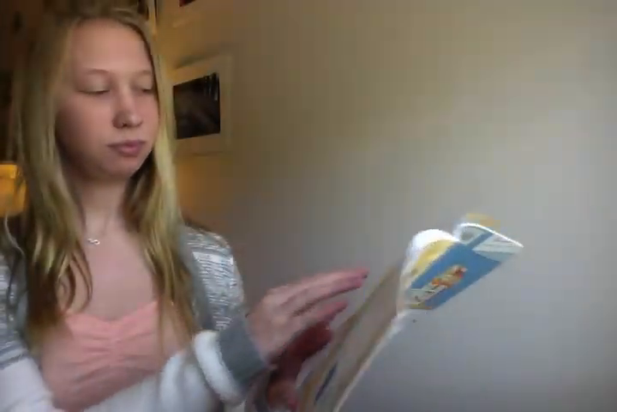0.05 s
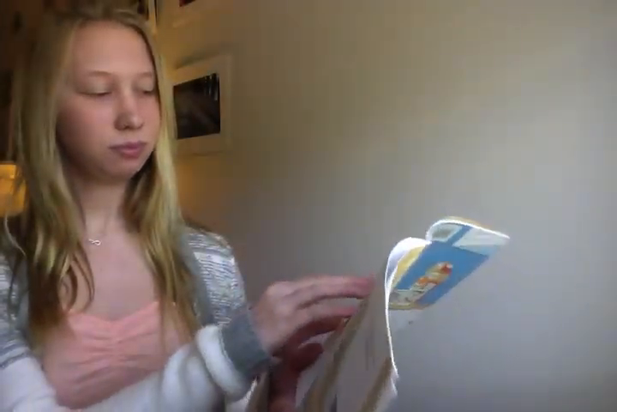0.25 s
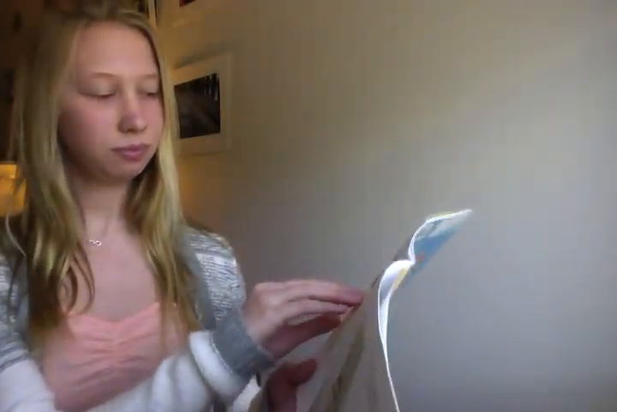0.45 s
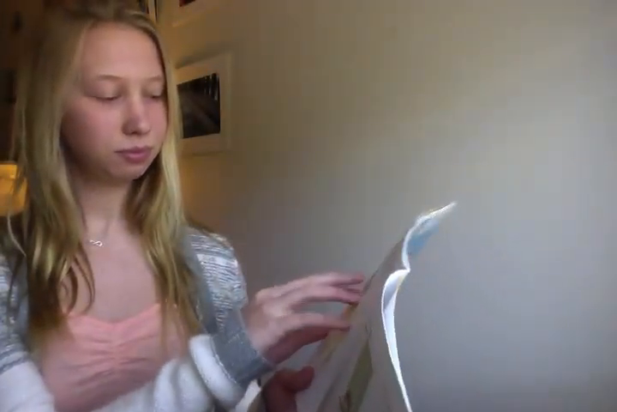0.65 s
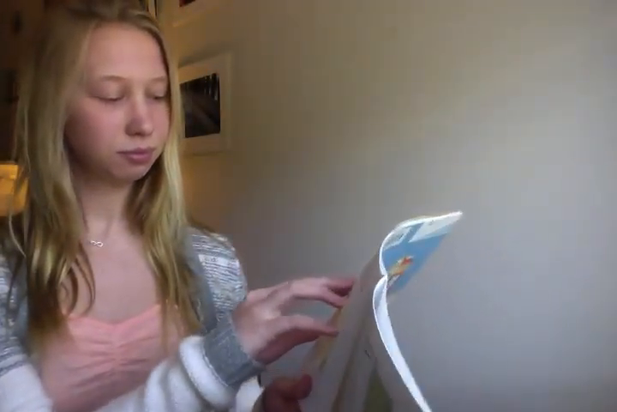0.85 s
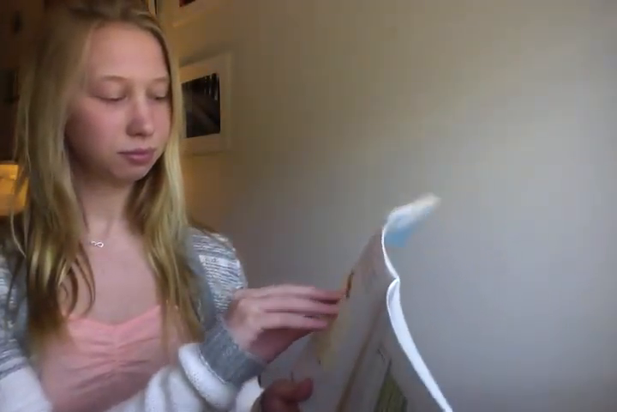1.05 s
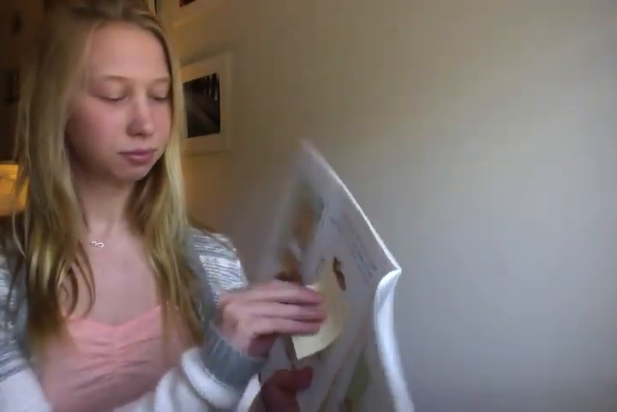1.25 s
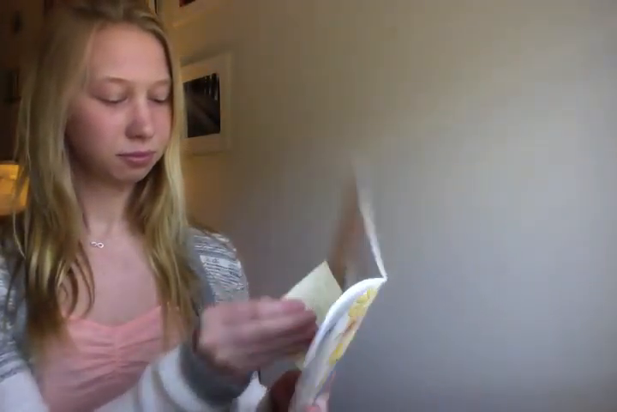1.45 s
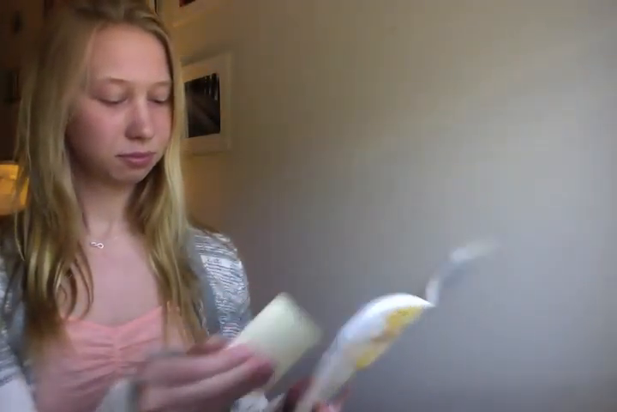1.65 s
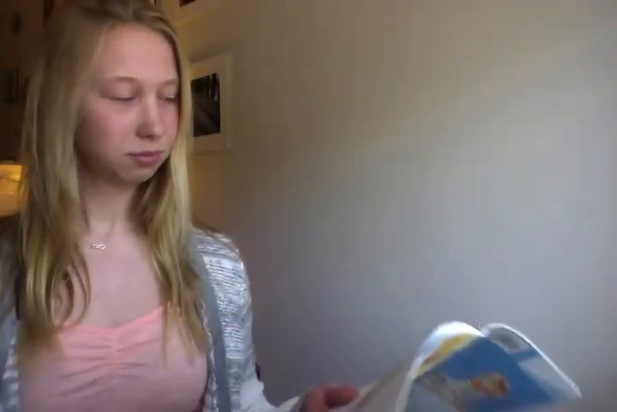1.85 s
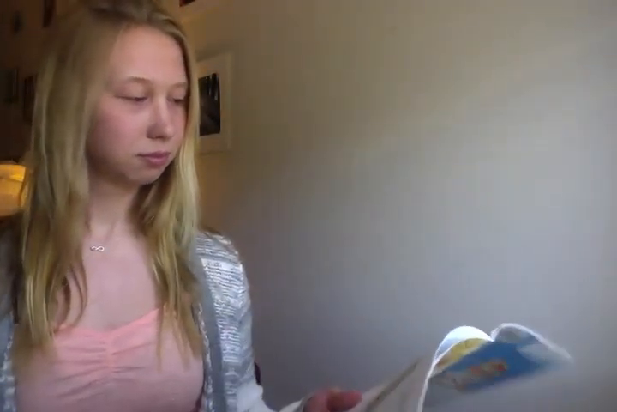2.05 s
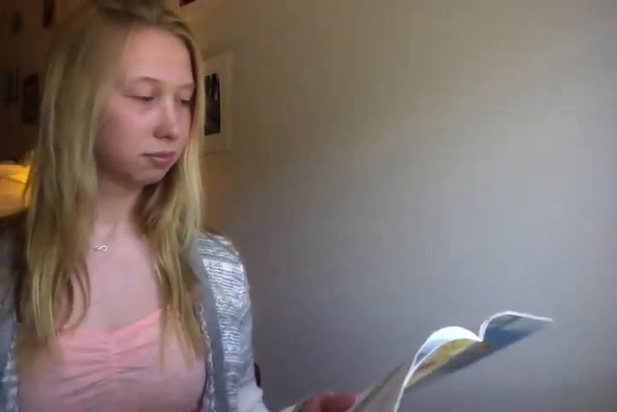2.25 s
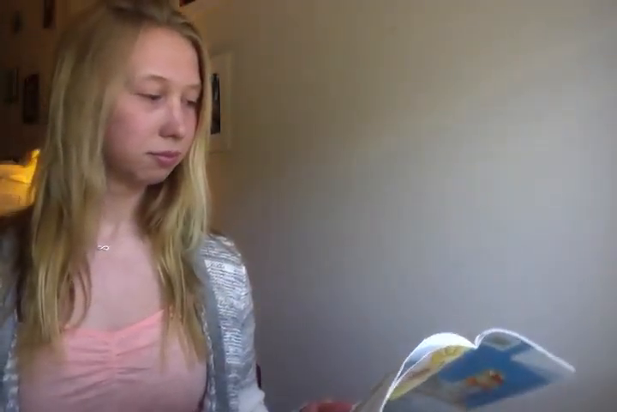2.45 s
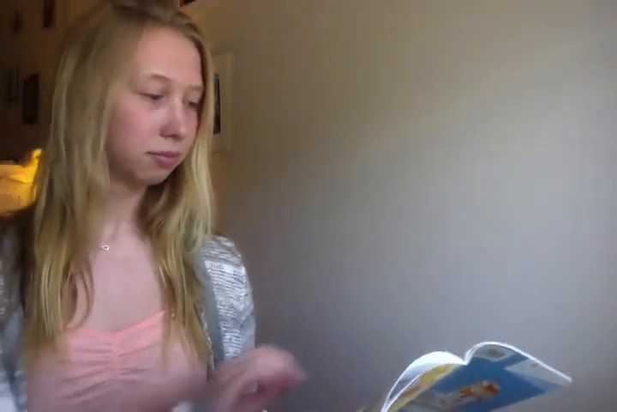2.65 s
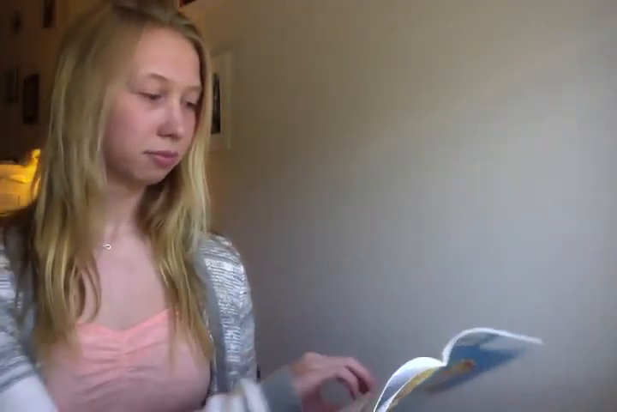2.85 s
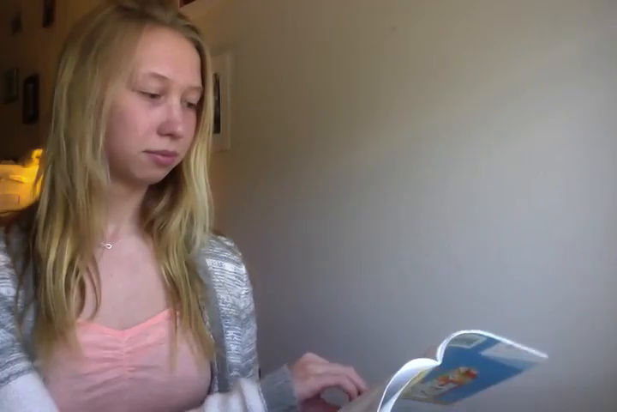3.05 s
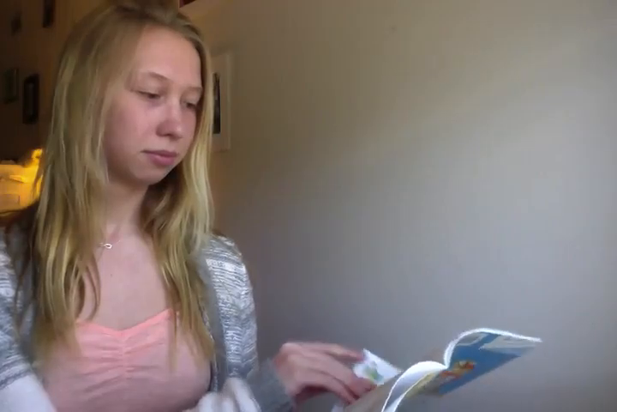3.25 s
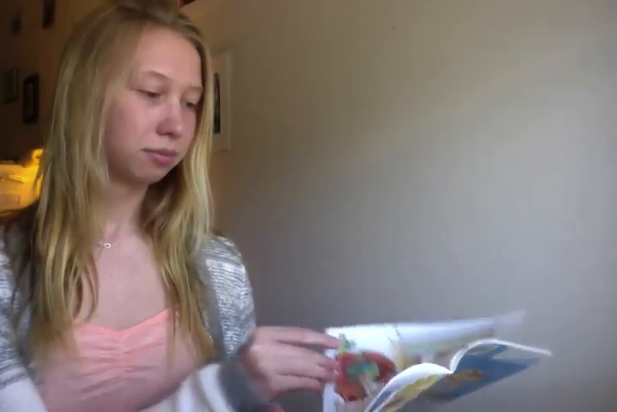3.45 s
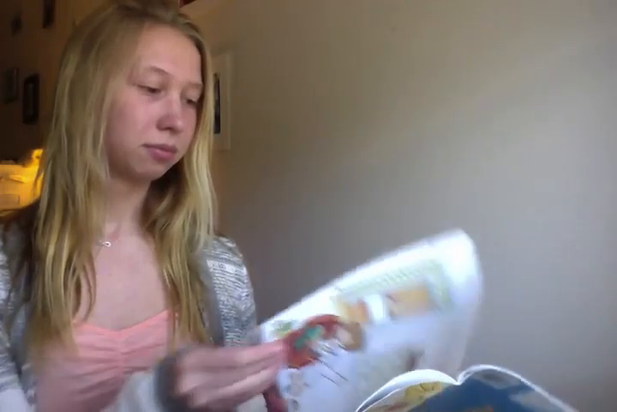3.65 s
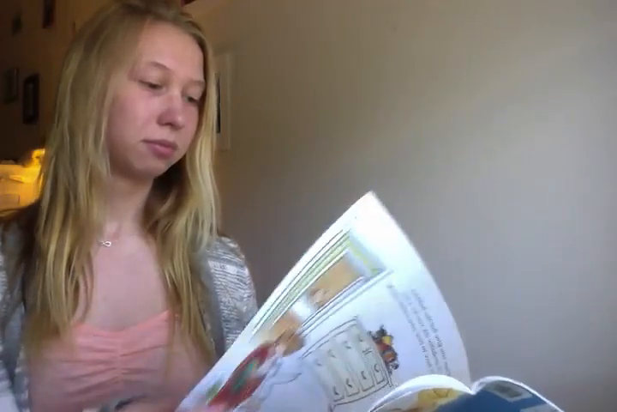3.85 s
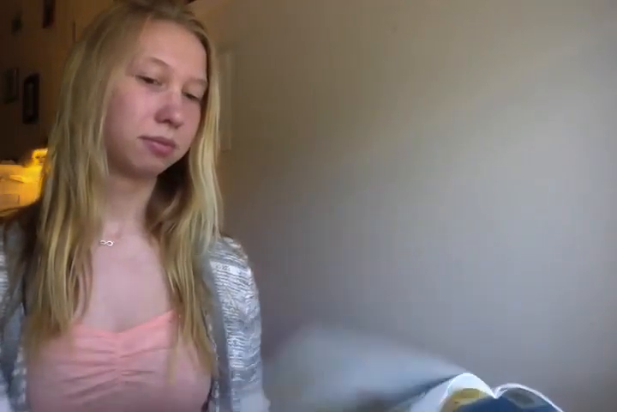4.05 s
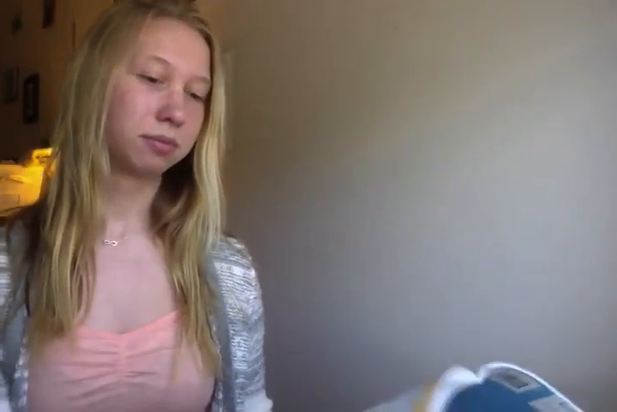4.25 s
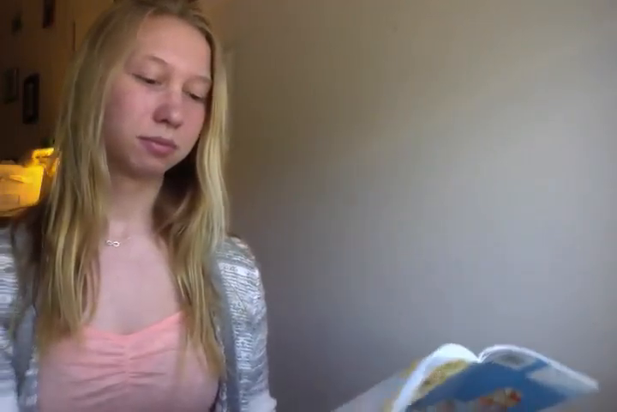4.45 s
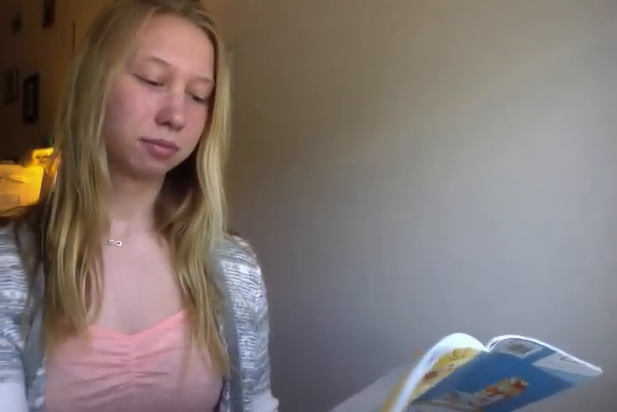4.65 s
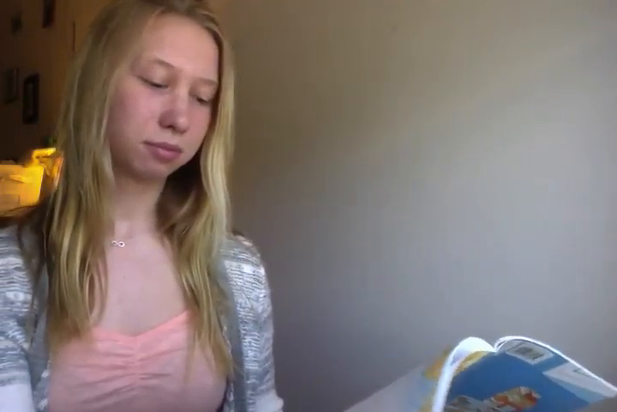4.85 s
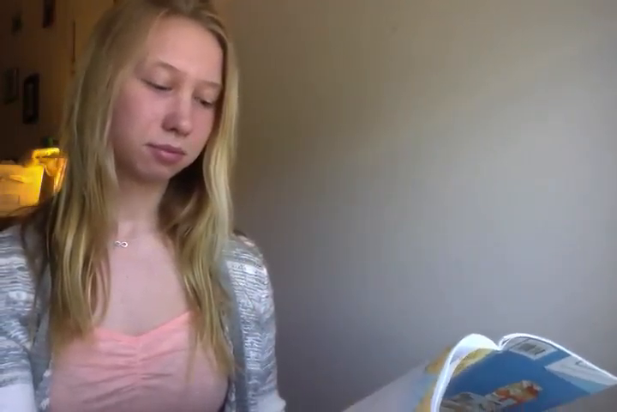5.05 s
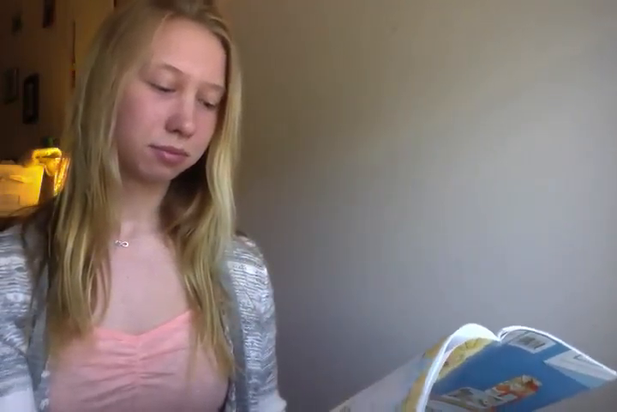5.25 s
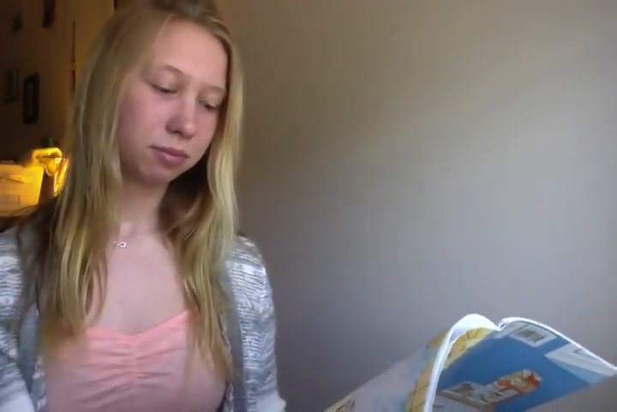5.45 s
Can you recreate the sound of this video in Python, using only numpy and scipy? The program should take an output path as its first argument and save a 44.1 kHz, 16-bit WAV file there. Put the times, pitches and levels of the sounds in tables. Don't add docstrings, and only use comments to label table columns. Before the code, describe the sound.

Paper handling in a small, softly furnished-sounding room: faint rustle, a dull knock, then a loud crisp crack and bright rasping sheets. After a pause come lighter crackles, and later a page turn with hollow buckling pops, flaps and a final rub. A thin boxy close microphone also catches low fan drone, slight whine and hiss, left alone at the end.

```python
import sys
import numpy as np
from scipy import signal
from scipy.io import wavfile
from scipy.ndimage import uniform_filter1d

SR = 44100
rng = np.random.default_rng(int(sys.argv[2]) if len(sys.argv) > 2 else 0)


def dump_mix(stems):
    frames = np.atleast_2d(stems).T
    limited = np.clip(frames, -1, 1)
    pcm = np.round(limited * 32767).astype(np.int16)
    wavfile.write(sys.argv[1], SR, pcm)


def magnitude_from_level(level_db):
    exponent = np.asarray(level_db, float) / 20
    return 10 ** exponent


N = 243146
AWAY_S = (3.05, 3.9)


def evened(x):
    return x / np.sqrt(np.mean(x ** 2) + 1e-20)


def peaked(x, db):
    return magnitude_from_level(db) * x / abs(x).max()


def smoothed(x, size, axis=-1):
    return uniform_filter1d(uniform_filter1d(x, size, axis), size, axis)


def read(points, hz):
    f, value = np.transpose(points)
    return np.interp(np.log(hz + 1), np.log(f + 1), value)


def add(mix, s, sound):
    part = mix[round(s * SR):][:len(sound)]
    part += sound[:len(part)]


def dull(x, hz):
    return signal.sosfilt(signal.butter(2, hz, fs=SR, output="sos"), x)


def thinned(x, hz):
    return signal.sosfilt(signal.butter(2, hz, "highpass", fs=SR, output="sos"), x)


def band(x, lo_hz, hi_hz):
    sos = signal.butter(4, [lo_hz, hi_hz], "bandpass", fs=SR, output="sos")
    return signal.sosfilt(sos, x) * np.sqrt(SR / 2 / (hi_hz - lo_hz))


def resonate(x, hz, width):
    turn = np.exp(2j * np.pi * hz * np.arange(len(x)) / SR)
    r = np.exp(-np.pi * width / SR)
    return 2 * (turn * signal.lfilter([1 - r], [1, -r], x / turn)).real


# (frequency [Hz], level [dB per Hz])
AIR_SPECTRUM = [(15, -79.5), (25, -43), (85, -15.5), (103, -8.5), (124, -7.5), (141, -11), (179, -4.5),
                (322, -19.5), (1010, -19), (1100, -16), (1290, -26), (1820, -20.5), (2250, -30),
                (3540, -31.5), (14300, -45.5), (15200, -64)]


def hiss(patchy_db=-0.95):
    frames, hz = N // 512 + 5, np.fft.rfftfreq(2048, 1 / SR)
    a, b, patches = rng.standard_normal((frames, 1025, 3)).T
    patches = uniform_filter1d(uniform_filter1d(patches, 20, 0), 8, 1)
    level_db = read(AIR_SPECTRUM, hz)[:, None] + patchy_db * evened(patches)
    noise = signal.istft((a + 1j * b) * magnitude_from_level(level_db), nperseg=2048, noverlap=1536)[1][:N]
    return magnitude_from_level(-70.5) * evened(noise)


# (frequency [Hz], width [Hz], level [dB])
FAN_TONES = [
    (116.6, 11, -78),
    (1060, 8.4, -84),
    (918, 60, -88.5),
]


def fan_tones(shake):
    return sum(magnitude_from_level(db) * evened(resonate(resonate(shake, hz, width), hz, width))
               for hz, width, db in FAN_TONES)


def fan_drone(shake):
    t, drone_hz = np.arange(N) / SR, 169.4
    wander_hz = 1.5 * evened(smoothed(shake, 4000))
    steady = np.sqrt(2) * np.sin(2 * np.pi * np.cumsum(drone_hz + wander_hz) / SR)
    rough = evened(resonate(resonate(shake, drone_hz, 23), drone_hz, 12))
    beat_db = 6.6 * np.cos(2 * np.pi * 1.02 * t - 4.0) + 2.5 * np.cos(2 * np.pi * .47 * t - 1.6)
    return (0.9 * steady + 0.35 * rough) * magnitude_from_level(-73.5 + beat_db)


# (time [s], level [dB])
AIR_SWELL = [
    (0, 4),
    (.5, 2),
    (1.3, 8),
    (2, 4.5),
    (2.5, 7),
    (3, 4),
    (3.5, 7),
    (4.8, 3),
    (5.52, -3.5),
]


def air():
    noise = hiss()
    shake = rng.standard_normal(N)
    swell = magnitude_from_level(np.interp(np.arange(N) / SR, *np.transpose(AIR_SWELL)))
    return swell * (noise + fan_tones(shake) + fan_drone(shake))


def burst(shudder, t60, tick):
    t = np.arange(len(shudder)) / SR
    dying = shudder * magnitude_from_level(-60 * t / max(t60, .003)) * np.minimum(t / 0.00064, 1)
    return dying + tick * (np.arange(len(t)) == 8)


def ring(x, hz, sharp):
    for _ in range(3):
        x = resonate(x, hz, hz / sharp)
    return x


def low_note(db, hz, t60):
    return peaked(ring(burst(rng.standard_normal(3500), t60, tick=7.7), hz, sharp=1.25), db)


# (time [s], peak level [dB], pitch [Hz])
THUMPS = [(.251, -57, 348), (0.992, -45, 103), (0.989, -31, 285), (.9951, -34.5, 318), (1.004, -44.5, 210),
          (1.0245, -45, 425), (1.04, -42, 362), (1.294, -37.5, 226), (1.344, -42, 375), (1.382, -44.5, 200),
          (2.063, -49, 315), (2.242, -42, 149), (2.243, -38, 288), (2.2537, -39, 340), (2.256, -36, 250),
          (2.2988, -46.5, 373), (2.326, -46.5, 327), (2.33, -45.5, 223), (2.3542, -46.5, 380),
          (2.428, -50.5, 333), (2.555, -40.5, 280), (3.598, -51.5, 227), (3.779, -40, 348)]


def thumps():
    out = np.zeros(N)
    for s, db, hz in THUMPS:
        add(out, s, low_note(db, hz, .008 + 4.5 / hz))
    return thinned(out, 60)


# (time [s], peak level [dB], pitch [Hz])
KNOCKS = [(.036, -51.5, 910), (.87, -52.5, 766), (0.9883, -28, 528), (1.135, -44.5, 576), (1.214, -29, 945),
          (1.222, -37, 1050), (1.343, -26.5, 954), (1.3965, -33.5, 726), (1.476, -36.5, 580),
          (2.195, -50.5, 563), (2.552, -39.5, 430), (2.5613, -39, 452), (3.338, -37, 670),
          (3.374, -42.5, 740), (3.41, -47.5, 636), (3.434, -48, 643), (3.599, -26.5, 638),
          (3.6081, -42.5, 500), (3.714, -45.5, 729), (3.7575, -34, 804), (3.77, -27, 702),
          (3.7811, -25.5, 820), (3.8061, -29, 783), (3.8241, -41, 743), (3.8513, -43.5, 731),
          (3.909, -36.5, 623), (3.94, -45, 613), (4.096, -39, 774), (4.185, -45, 410), (4.261, -43, 743)]


def knocks():
    out = np.zeros(N)
    for s, db, hz in KNOCKS:
        add(out, s, low_note(db, hz, .016))
    return thinned(out, 60)


def upper_levels(crackle_db, fizz_db, top_db):
    bright = np.minimum(fizz_db - crackle_db, 3)
    return [crackle_db - 4.0, crackle_db - 3.0 + 0.28 * bright, fizz_db, fizz_db + top_db + .4 * bright]


def rubbing(peak_db, shape_db, fizz_db, weight_db):
    crackle_db = peak_db + shape_db
    thud_db = peak_db + 0.8 * shape_db + weight_db - 7
    body_db = crackle_db + weight_db
    uppers = upper_levels(crackle_db, crackle_db + fizz_db, top_db=-10.5)
    return magnitude_from_level(2 * np.array([thud_db, body_db] + uppers))


def stroke_shape(coarse, s, rise, fall, curl):
    distance = np.maximum((s - coarse) / max(rise, 1e-3), (coarse - s) / max(fall, 1e-3))
    return np.maximum(-21 * distance ** curl, -200)


# (time [s], crackle level [dB])
GRIP = [
    (0, -90),
    (.7, -76.5),
    (1.0, -81.5),
    (2.1, -89.5),
    (2.7, -74),
    (3.2, -81.5),
    (3.7, -82.5),
    (4.25, -68.5),
    (4.72, -82),
    (4.8, -110),
]


def grip(coarse):
    return rubbing(np.interp(coarse, *np.transpose(GRIP)), 0 * coarse, fizz_db=-9.5, weight_db=4.5)


# (fastest time [s], rise [s], fall [s], crackle level [dB], fizz against it [dB])
SWISHES = [(.38, 0.088, 0.068, -67.5, -6), (.466, 0.014, 0.077, -61.5, -13), (0.553, 0.042, 0.069, -55, 0),
           (1.144, 0.071, 0.064, -59, 4.2), (1.466, 0.07, 0.096, -39.5, 5.5), (1.54, 0.14, 0.057, -43, 6),
           (1.614, 0.087, 0.056, -34.5, -4), (2.07, .04, 0.039, -75.5, -8.5),
           (2.251, 0.037, 0.051, -46.5, 2.7), (2.401, 0.051, 0.042, -61, 4), (2.934, .015, 0.044, -67, -4),
           (3.29, .04, 0.084, -69, 0.5), (3.414, 0.15, 0.04, -49.5, -4.5), (3.55, 0.072, 0.038, -67.5, -17),
           (4.01, 0.044, 0.14, -61, -0.5), (4.071, 0.043, 0.063, -47, -11.5),
           (4.16, .06, 0.053, -54, -10.5), (4.3, 0.054, 0.074, -51.5, -10), (4.375, 0.022, 0.023, -57, -38),
           (4.45, 0.093, 0.37, -70, -10)]


def swishes(coarse):
    return sum(rubbing(db, stroke_shape(coarse, s, rise, fall, curl=1.7), fizz_db, 0)
               for s, rise, fall, db, fizz_db in SWISHES)


# (time [s], fall [s], crackle level [dB], fizz against it [dB], weight against it [dB])
SHUDDERS = [(0.001, .09, -80, -9, 6), (1.224, 0.084, -35, -5, -17), (1.402, 0.12, -43.5, -5, 5),
            (1.74, 0.037, -67, -10.5, 5), (2.195, 0.12, -45, -18, -5.5), (2.222, 0.049, -42, -17, -3),
            (2.317, 0.048, -46, 1.5, -8), (2.323, 0.064, -43.5, -2, -13), (2.568, 0.041, -54, -2.5, 7),
            (3.18, .07, -72, -10, 0.5), (3.256, .05, -55.5, -5.5, -5), (3.609, 0.028, -49, -11, 10.5),
            (3.782, 0.053, -53, -41, 14.5), (4.108, 0.038, -50.5, -1, 4.5), (4.274, 0.048, -40, -14, -5.5),
            (4.287, 0.04, -38, -14.5, -22), (4.303, 0.027, -37, -13, -14.5), (1.408, .05, -52, 9.5, -6.5),
            (4.382, 0.054, -72.5, -24.5, 17)]


def shudders(coarse):
    return sum(rubbing(db, stroke_shape(coarse, s, .006, fall, curl=1), fizz_db, weight_db)
               for s, fall, db, fizz_db, weight_db in SHUDDERS)


def streaked(x, streak_db):
    z = signal.stft(x, nperseg=256)[2]
    streaks = uniform_filter1d(uniform_filter1d(rng.standard_normal(z.T.shape), 24, 0), 2, 1).T
    return evened(signal.istft(z * magnitude_from_level(streak_db * evened(streaks)), nperseg=256)[1][:N])


def fibres():
    t, grains_per_s = np.arange(N) / SR, 1300
    heights = magnitude_from_level(3.9 * np.minimum(rng.exponential(1, N), 5))
    ticks = heights * (rng.random(N) < grains_per_s / SR) * rng.choice([-1., 1.], N)
    smooth = np.where((t > 1.38) & (t < 1.68), 1.0, 2.2)
    rub = streaked(evened(ticks) + smooth * rng.standard_normal(N), streak_db=3.2)
    return rub * magnitude_from_level(2.0 * evened(smoothed(rng.standard_normal(N), 200)))


# (low edge [Hz], high edge [Hz])
PAPER_BANDS = [
    (280, 1013),
    (1100, 2690),
    (3000, 4600),
    (4600, 7000),
    (7000, 12500),
    (12500, 15700),
]


def slides():
    t, coarse = np.arange(N) / SR, np.arange(0, N / SR, 1 / 1000)
    power = grip(coarse) + swishes(coarse) + shudders(coarse)
    power[-1, (coarse > AWAY_S[0]) & (coarse < AWAY_S[1])] *= magnitude_from_level(-20)
    rub = fibres()
    return sum(band(rub * np.interp(t, coarse, np.sqrt(p)), *edges)
               for p, edges in zip(power, PAPER_BANDS))


def crease_body(shudder, db, hz, t60):
    return peaked(ring(burst(shudder, t60, tick=3.6), hz, sharp=1.23), db)


def crease_crackle(shudder, levels_db, t60):
    shorts = [1, 1, 0.6, 0.6]
    return sum(peaked(band(burst(shudder, t60 * short, tick=1.8), *edges), db)
               for short, edges, db in zip(shorts, PAPER_BANDS[2:], levels_db))


def snaps(rows, pitches_hz, top_db, t60):
    body, upper = np.zeros(N), np.zeros(N)
    for (s, body_db, crackle_db, fizz_db), hz in zip(rows, pitches_hz):
        shudder = rng.standard_normal(2500)
        add(body, s, crease_body(shudder, body_db, hz, t60))
        crackle = crease_crackle(shudder, upper_levels(crackle_db, fizz_db, top_db), t60)
        add(upper, s, dull(crackle, 11000) if AWAY_S[0] < s < AWAY_S[1] else crackle)
    return upper + dull(body, 4500)


# (time [s], body level [dB], crackle level [dB], fizz level [dB], body pitch [Hz])
TURN_SNAPS = [(2.9359, -56, -53.5, -42, 1835), (3.168, -40.5, -47.5, -52, 2190),
              (3.1758, -32, -37, -40, 2070), (3.2584, -56, -56, -51, 2240), (3.3386, -34, -42, -42, 1610),
              (3.3502, -35.5, -41, -39, 1810), (3.3735, -32, -56, -53, 1840), (3.3814, -46, -42, -40, 2158),
              (3.4105, -38, -59, -49, 1772), (3.4363, -35, -46, -46.5, 1500),
              (3.5992, -25.5, -55, -41.5, 1580), (3.6038, -30, -34.5, -44, 1269),
              (3.7156, -49, -69, -67, 1357), (3.7407, -40.5, -60, -74.5, 1593),
              (3.7568, -35, -66, -65, 1740), (3.771, -19.5, -42.5, -77, 2005),
              (3.776, -24.5, -36.5, -76, 1455), (3.8009, -37.5, -53, -70, 1440),
              (3.91, -44.5, -78.5, -75, 1140), (4.045, -38, -45, -47, 2238),
              (4.0955, -22.5, -30.5, -42, 2080), (4.106, -42, -34, -41.5, 1780),
              (4.26, -40, -70, -70, 1390), (4.3735, -38, -64, -80, 2348)]


def turn_snaps():
    rows = [row[:4] for row in TURN_SNAPS]
    return snaps(rows, [row[4] for row in TURN_SNAPS], top_db=-43, t60=.026)


# (time [s], body level [dB], crackle level [dB], fizz level [dB])
PEEL_SNAPS = [(0.039, -57, -78, -78), (.5396, -37.5, -44, -50), (0.872, -55, -77, -61),
              (0.9858, -40.5, -67, -57), (0.9907, -33.5, -43, -76), (1.1349, -43.5, -40, -46),
              (1.1452, -54, -41, -50), (1.2047, -43, -31.5, -40), (1.2133, -15.5, -12.5, -4),
              (1.2188, -20.5, -37, -11.5), (1.3435, -22, -20, -22.5), (1.3491, -26.5, -17.5, -32),
              (1.3974, -24.5, -46, -53.5), (1.4487, -32, -43, -28), (1.4832, -22, -26, -18.5),
              (1.5188, -28.5, -60, -24), (1.539, -28, -53, -27), (1.5703, -34, -56, -40),
              (1.6061, -25, -34, -23), (1.6142, -30, -24, -17.5), (1.6338, -24, -47, -54),
              (1.7131, -33, -56.5, -64), (2.191, -33, -49.5, -59), (2.1999, -34.5, -29.5, -49),
              (2.2208, -35, -46, -58), (2.245, -40, -29.5, -38), (2.2531, -57, -32.5, -31),
              (2.3271, -46, -30.5, -30), (2.5529, -37, -47, -41), (2.562, -36, -28.5, -37)]


def peel_snaps():
    crisp_db, soft_db = -47, -69
    crackle_db = np.transpose(PEEL_SNAPS)[2]
    soft = np.clip((crisp_db - crackle_db) / (crisp_db - soft_db), 0, 1)
    pitches_hz = 1962 * (1 - 0.43 * soft) * (1 + 0.017 * rng.standard_normal(len(soft)))
    return snaps(PEEL_SNAPS, pitches_hz, top_db=-15, t60=.019)


# (frequency [Hz], t60 [s])
ROOM_DECAY = [
    (250, 0.16),
    (660, .2),
    (1740, 0.19),
    (4590, 0.15),
    (12100, 0.05),
]
# (time [s], level [dB])
ECHOES = [
    (.0016, -25.5),
    (.0033, -17.5),
    (.0056, -17.5),
    (.0105, -15.5),
    (.016, -17.5),
]


def room(x):
    taps, near = np.zeros(SR // 2), np.zeros(SR // 2)
    at = np.arange(150, SR // 2 - 20, 12)
    taps[at + rng.integers(0, 12, len(at))] = rng.choice([-1., 1.], len(at))
    hz, t, z = signal.stft(taps, SR, nperseg=256)
    decay = magnitude_from_level(-60 * t / read(ROOM_DECAY, hz)[:, None])
    tail = signal.istft(z * decay, SR, nperseg=256)[1][:len(near)]
    for k, (s, db) in enumerate(ECHOES):
        near[round(s * SR)] = (-1) ** k * magnitude_from_level(db)
    return signal.fftconvolve(x, near + magnitude_from_level(-10) * tail / np.linalg.norm(tail))[:N]


# (frequency [Hz], width [Hz], lift [dB])
HOUSING = [
    (880, 810, 4),
    (2137, 390, 2.5),
    (3670, 2050, 6.5),
    (5278, 390, 7.5),
    (9700, 1610, 8.5),
]


def housing(x):
    return x + sum((magnitude_from_level(db) - 1) * resonate(x, hz, width) for hz, width, db in HOUSING)


def scene():
    creases = peel_snaps() + turn_snaps()
    book = dull(knocks() + thumps(), 2500)
    paper = magnitude_from_level(-2.5) * creases + book + magnitude_from_level(-4.5) * slides()
    paper = paper + room(paper)
    return (magnitude_from_level(-5) * housing(paper) + air())[None]


def band_limit(x):
    return signal.sosfilt(signal.butter(12, 16590, fs=SR, output="sos"), x)


def record(dry):
    thin = thinned(dry, 70)
    finished = signal.sosfilt(signal.butter(8, 16000, fs=SR, output="sos"), thin)
    return band_limit(finished)


dry = scene()
out = record(dry)
dump_mix(out)
```